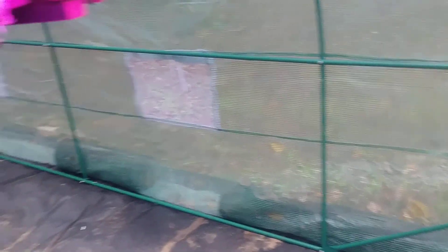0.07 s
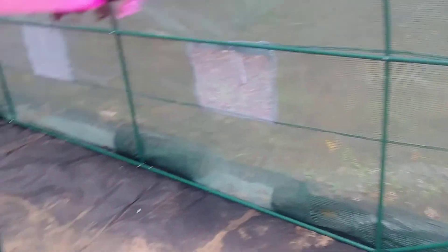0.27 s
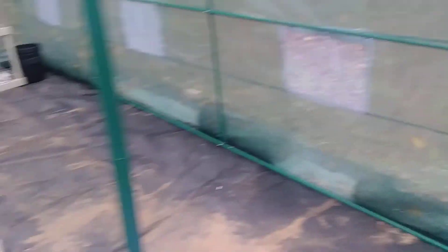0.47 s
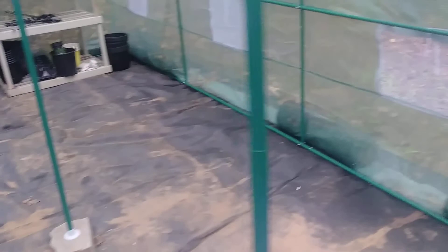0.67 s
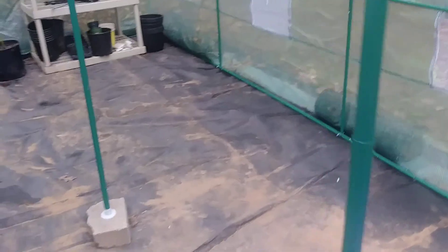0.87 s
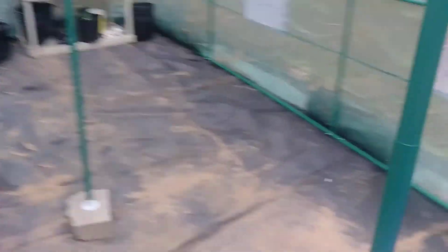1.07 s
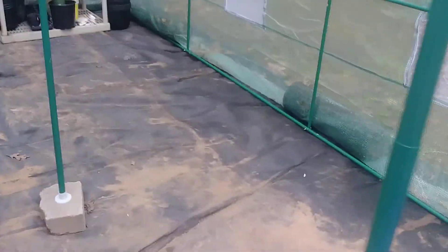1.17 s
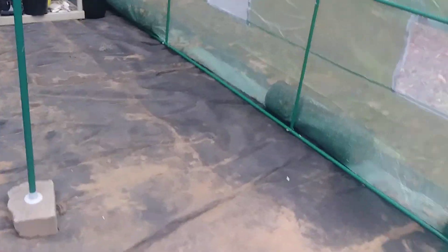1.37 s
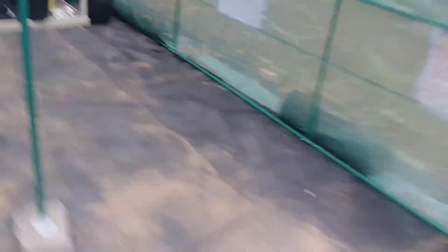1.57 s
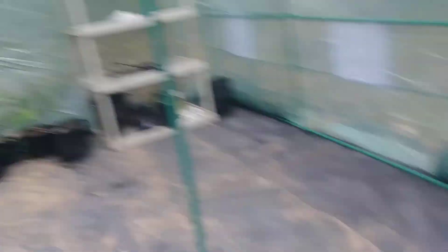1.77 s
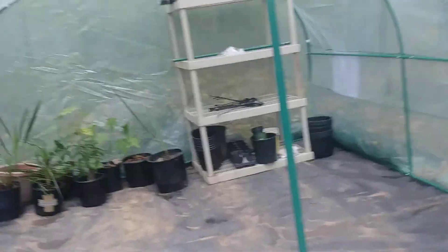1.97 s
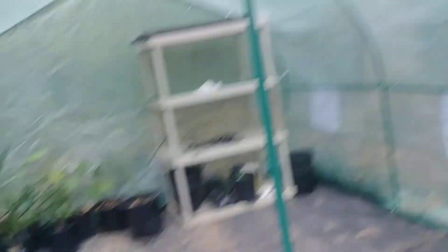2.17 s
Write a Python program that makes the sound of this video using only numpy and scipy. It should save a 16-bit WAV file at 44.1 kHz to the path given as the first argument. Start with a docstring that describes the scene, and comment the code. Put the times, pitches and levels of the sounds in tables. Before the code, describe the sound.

Rain patters on the plastic cover of a small greenhouse, heard from inside. Heavy drops tap sharply and unevenly, soften briefly midway, then come back hard, with a faint, flickering hiss of finer rain behind them.

```python
"""Rain on the plastic cover of a small greenhouse, heard from inside. From the start, fine rain
hisses further off over a low hush. At once heavy drops tap the taut sheet, each with its own colour,
and rattle round the tunnel in grainy echoes. They soften around one second, then come back hard.
All along, a noise suppressor eats most of the steady hiss and leaves a flickering rest."""
import sys
import numpy as np
from scipy import signal
from scipy.fft import rfft, irfft, next_fast_len
from scipy.io import wavfile
from scipy.ndimage import uniform_filter1d

SR = 44100
rng = np.random.default_rng(int(sys.argv[2]) if len(sys.argv) > 2 else 0)


def to_wav(s):
    """Save 16-bit WAV."""
    ch = np.atleast_2d(s).T  # columns
    pcm = np.round(np.clip(ch, -1, 1) * 32767)  # PCM
    wavfile.write(sys.argv[1], SR, pcm.astype(np.int16))


N = 97902


def amp(db):
    """Turns decibels into a factor to multiply by."""
    return 10 ** (np.asarray(db) / 20)


def unit(x):
    """Scales a signal to an average power of one."""
    return x / np.sqrt(np.mean(x ** 2) + 1e-20)


def glide(position, values):
    """Draws straight lines between values that lie one step apart."""
    return np.interp(position, np.arange(len(values)), values)


def band(x, low_hz, high_hz, order):
    """Keeps one range of frequencies, with the energy of the whole sound."""
    y = signal.sosfilt(signal.butter(order, [low_hz, high_hz], "band", fs=SR, output="sos"), x)
    return y * np.linalg.norm(x) / np.linalg.norm(y)


def coloured(x, curve, resonances=()):
    """Shapes a sound with a tone curve, lifted at any resonances."""
    size = 8192
    curve_hz, curve_db = np.transpose(curve)
    hz = np.fft.rfftfreq(size, 1 / SR)
    gain_db = np.interp(np.log(hz + 1), np.log(curve_hz + 1), curve_db)
    gain_db += sum(lift / (1 + (2 * (hz - centre) / width) ** 2) for centre, width, lift in resonances)
    # minimum phase: the filter rings after a tap, never before it
    cepstrum = irfft(np.log(amp(gain_db) + 1e-6))
    cepstrum *= np.r_[1, np.full(size // 2 - 1, 2), 1, np.zeros(size // 2 - 1)]
    return signal.fftconvolve(x, irfft(np.exp(rfft(cepstrum))))[:N]


# where the sheet rings or swallows sound: f/Hz, width/Hz, lift/dB
SHEET_RESONANCES = [(353, 55, 4), (490, 15, 2.5), (968, 77, 2.5), (1146, 77, 5), (1224, 7.5, -4.5),
                    (1582, 110, 2), (2045, 6.7, 16.5), (2283, 16, -1), (2690, 33, 2), (3350, 17, -6),
                    (4475, 30, 2.5), (4610, 38, -6.5), (4850, 31, 0.5), (5240, 13, -2.5)]
def plastic_sheet(x, curve):
    """The taut sheet adds its own ringing to the tone curve of any rain that hits it."""
    return coloured(x, curve, SHEET_RESONANCES)


# tone curve of the fine rain: f/Hz, relative level/dB
FINE_RAIN_TONE = [(470, -45.5), (800, -9.5), (1380, -5.5), (1580, -3), (1810, -9), (2570, 4.5), (3260, 1.5),
                  (4000, -9.5), (5300, -17), (6130, -39.5), (7970, -64), (13500, -120)]
def fine_rain(level_db=-49, ticks_per_s=560, scatter_db=2, hiss_share=0.63):
    """Small, far drops make ticks of uneven size over a hiss."""
    chance, size = rng.random((2, N))
    ticks = unit((chance < ticks_per_s / SR) * amp(-scatter_db * np.log(size + 0.0099)))
    mix = hiss_share * rng.standard_normal(N) + (1 - hiss_share) * ticks
    return amp(level_db) * unit(plastic_sheet(mix, FINE_RAIN_TONE))


# tone curve of the hush: f/Hz, relative level/dB
HUSH_TONE = [(25, -23.5), (70, 1.5), (110, 1.5), (250, -1), (1200, -10), (5000, -20.5), (7000, -34.5)]
def low_hush(level_db=-68, waver_db=4, wavers_per_s=14):
    """A faint, low noise whose level wavers at random."""
    waver = glide(np.arange(N) / SR * wavers_per_s, rng.standard_normal(N))
    return amp(level_db + waver_db * waver) * unit(coloured(rng.standard_normal(N), HUSH_TONE))


def grainy_echoes(t, hollow_db=2.5, hollow_hz=357.8, grain_db=2.5, grain_s=0.0015):
    """Noise as a train of uneven echoes; each spot of the sheet favours its own random pitches."""
    noise, grains, bumps = rng.standard_normal((3, len(t)))
    hollow = amp(hollow_db * glide(np.fft.rfftfreq(len(t), 1 / SR) / hollow_hz, bumps))
    unevenness = amp(grain_db * glide(t / grain_s, np.clip(grains, -2, 2)))
    return unit(irfft(rfft(noise) * hollow, len(t))) * unit(unevenness)


def tap_and_echoes(t, tap_db, echoes, fade_s, width_hz, rise_s=0.00076, near_db=-8.5, near_fade_s=0.083):
    """A sharp tap, then echoes that build and fade; the nearest walls add a quick answer."""
    tap = amp(tap_db) * (t == 0) * np.sqrt(SR / 2 / width_hz)  # stronger for a narrower band
    fade = amp(-60 * t / fade_s) + amp(near_db - 60 * t / near_fade_s)
    return tap + echoes * fade * (1 - np.exp(-t / rise_s))


# a drop's thump, low, middle, high and splash bands: low f/Hz, high f/Hz, base fade t/s (to -60 dB)
DROP_BANDS = [(244.7, 466, 0.12), (761, 1887, 0.24), (1980, 3660, 0.35), (3780, 5436, 0.2),
              (7100, 12240, 0.21)]
# a struck panel's three notes: sharpness (pitch over width), base fade t/s (to -60 dB)
PANEL_NOTES = [(3, .18), (6, 0.11), (7.5, 0.12)]
# tone curve of the sheet under heavy drops: f/Hz, level/dB
SHEET_TONE = [(200, -7), (380, -3.5), (800, -11.5), (1400, -9.5), (1850, -11), (2350, -5), (3230, -5.5),
              (4000, -7), (4450, -5), (5100, -14), (5800, -13), (6900, -2.5), (8500, -8.5), (12000, -26)]
# one drop a row: t/s, level/dB, base tap over echoes/dB, stretch of the fade times, five bands'
# level/dB, three notes' f/Hz and level/dB; band and note levels add to the drop's level
HEAVY_DROPS = [(0.001, -29, 8.5, 1.25, -37, -17.5, -6, -11, -32.5, 580, -21, 1460, -10, 2010, -9.5),
               (0.158, -48.5, 15, 1.3, -28.5, -19.5, -5, -21.5, -43.5, 583, -32, 1700, -10.5, 2870, -15.5),
               (0.237, -26, 0.5, 1.58, -13.5, -9.5, -9, -14, -70, 720, -8, 1295, -6, 3160, -9),
               (0.259, -26, 8.5, 0.55, -13.5, -17.5, -9.5, -7, -62.5, 750, -16, 773, -9, 3720, -12),
               (0.2975, -16.5, -7.5, 1.69, -17, -8.5, -17.5, -15, -72.5, 490, -18.5, 1024, -16.5, 3070, -15.5),
               (0.324, -16.5, 7, 0.77, -25.5, -6.5, -16, -17, -47.5, 1200, -14.5, 1500, -22, 2690, -26.5),
               (0.478, -19, 2.5, 1.2, -26, -8.5, -13.5, -20, -34, 702, -16.5, 1296, -12, 2370, -29.5),
               (0.596, -43, 17.5, 1.4, -35, -16.5, -30.5, -42, -63, 923, -4.5, 914, -15, 2690, -16),
               (0.628, -52, 7, 0.55, -26.5, 3, 10, -30, -45, 747, -39.5, 1086, -4.5, 2900, 4),
               (0.654, -31, 6.5, 1, -41, -11.5, -6, -29.5, -48, 662, -17, 1610, -5, 2220, -8),
               (0.678, -36, 4, 2.4, -47.5, -19.5, -6, -18, -49.5, 650, -29.5, 1530, -17.5, 2850, -7),
               (0.76, -33.5, 2, 2, -31.5, 4, -22, -42, -54, 630, -40, 1430, -1, 2560, -15.5),
               (0.785, -19, 3.5, 0.78, -30.5, -7.5, -8.5, -17.5, -47, 515, -20, 858, -6.5, 2330, -22),
               (0.796, -22, 8.5, 0.99, -37.5, -16, -8.5, -7.5, -31.5, 592, -9.5, 1480, -13, 2360, -20.5),
               (0.866, -21, 6.5, 1.36, -26.5, -14, -11.5, -12.5, -46, 678, -10.5, 1750, -7, 2300, -11),
               (0.897, -34, -5.5, 2.23, -25, -17, -4.5, -8, -49.5, 712, -26, 1780, -1, 1850, -4),
               (1.037, -42.5, 6.5, 1.3, -34.5, -18, -3, -22, -65, 748, -34, 943, -20, 2700, -9),
               (1.067, -36.5, 5.5, 1.4, -48.5, -11.5, -4.5, -32, -61.5, 1230, -10, 1525, -1.5, 2540, -6.5),
               (1.134, -39.5, 1.5, 0.49, -36, -16, -16.5, -11, -52, 525, -33.5, 1646, -1.5, 3370, -1),
               (1.214, -48.5, 8, 0.32, -30, -12, 3, -5.5, -38.5, 758, -29, 2130, -5, 3790, -14),
               (1.244, -41, 6, 1.63, -58.5, -18, 1, -7.5, -59, 550, -39, 1630, -31, 3260, 2),
               (1.278, -44, 6, 0.69, -38, -25, -27.5, -29, -49, 712, -37, 1710, 1, 2310, -18),
               (1.326, -18, 8.5, 1.06, -49.5, -23, -13.5, -12.5, -52, 783, -27.5, 1675, -15, 2530, -16.5),
               (1.345, -52, 17, 1.6, -39, -7.5, 0, 6, -43.5, 726, -33.5, 1640, -4.5, 3230, -8.5),
               (1.376, -17.5, 9.5, 1.26, -42.5, -13, -15, -11, -40.5, 436, -34.5, 1260, -11, 3285, -11.5),
               (1.508, -33, 6, 1.54, -11, -1, -19, -15.5, -55, 660, -7, 1180, -2.5, 2900, -8.5),
               (1.57, -27, 6, 0.47, -30.5, -13.5, -11, -22, -45, 570, -23, 1244, -10, 2760, -29.5),
               (1.587, -27.5, 10, 0.84, -43, -26, -21.5, -6.5, -52, 763, -30.5, 1430, -10, 2700, -18.5),
               (1.601, -35, 4, 3.6, -43.5, -11, -1.5, 0.5, -41, 614, -37.5, 1454, -16, 2940, -2.5),
               (1.625, -28, -13, 2.24, -21, -6.5, -7.5, -7.5, -31, 748, -9.5, 1220, -30, 3120, -7.5),
               (1.641, -19, 3, 1.08, -25.5, -15.5, -10, -13, -32, 510, -39.5, 1574, -13, 2220, -10),
               (1.685, -32.5, 1, 0.84, -27, -23, -23, -14, -53, 750, -25, 1540, -3.5, 2660, -15.5),
               (1.734, -24.5, -10, 0.57, -58, -12.5, -7, -8, -43, 730, -18, 1017, -5, 2230, -6),
               (1.745, -30.5, 9.5, 0.87, -63, -1, -31, -18, -36, 657, -27, 977, -5.5, 2500, -14),
               (1.807, -19, 8, 1.31, -26, -9, -19, -14.5, -47, 702, -21, 1266, -17.5, 2196, -17),
               (1.868, -15, 7, 1.01, -25, -13, -18.5, -14.5, -53, 612, -25, 1490, -10, 2450, -18.5),
               (1.95, -30.5, 7.5, 1.9, -36.5, -10, -13.5, -18.5, -47, 648, -35.5, 1193, -8.5, 2550, -10),
               (2.025, -18.5, 10, 1.62, -29.5, -9, -15, -14, -43.5, 620, -30, 1535, -8, 2230, -17.5),
               (2.064, -31.5, 16, 1.9, -37.5, -11, -8.5, -18, -45, 587, -17.5, 997, -24.5, 2015, -10.5),
               (2.141, -23, -1, 1.03, -18, -6, -7.5, -12, -32.5, 569, -8.5, 1465, -5.5, 2450, -21),
               (2.158, -27.5, 3, 1.18, -43, -3.5, -16, -4, -24, 480, -17.5, 890, 0.5, 2580, -17.5),
               (2.203, -17.5, 9.5, 2, -26, -6, -16, -13, -37, 690, -19, 1073, -17, 1980, -16)]
def heavy_drops(start_delay_s=0.000933, tap_lift_db=1):
    """Each drop taps, dies away band by band and sounds its panel's notes."""
    t = np.arange(SR // 3) / SR
    track = np.zeros(N + SR)
    for time_s, level_db, tap_db, stretch, *colour in HEAVY_DROPS:
        band_levels = colour[:len(DROP_BANDS)]
        notes = np.reshape(colour[len(DROP_BANDS):], (-1, 2))
        echoes = grainy_echoes(t)
        start = round((time_s + start_delay_s) * SR)
        span = slice(start, start + len(t))
        for db, (low_hz, high_hz, fade_s) in zip(band_levels, DROP_BANDS):
            burst = tap_and_echoes(t, tap_db + tap_lift_db, echoes, fade_s * stretch, high_hz - low_hz)
            track[span] += amp(level_db + db) * band(burst, low_hz, high_hz, order=5)
        for (hz, db), (sharpness, fade_s) in zip(notes, PANEL_NOTES):
            width = hz / sharpness
            burst = tap_and_echoes(t, tap_db + tap_lift_db, echoes, fade_s * stretch, width)
            track[span] += amp(level_db + db) * band(burst, hz - width / 2, hz + width / 2, order=3)
    return plastic_sheet(track[:N], SHEET_TONE)


def noise_suppressor(x, share_removed=0.93, deepest_cut_db=-14.5):
    """Takes most of the steady power, judged from the quiet moments, out of every frequency."""
    spectra = signal.stft(x, nperseg=1024, noverlap=768)[2]
    power = uniform_filter1d(abs(spectra) ** 2, size=3, axis=-1)  # smoothed over time
    quiet = np.percentile(power, 30, axis=-1, keepdims=True)
    steady = uniform_filter1d(quiet, size=9, axis=-2)  # smoothed over frequency
    gain = np.sqrt(np.clip(1 - share_removed * steady / (power + 1e-20), amp(deepest_cut_db) ** 2, 1))
    return signal.istft(spectra * gain, nperseg=1024, noverlap=768)[1][..., :N]


def scene():
    """Heavy and fine rain together, in one channel."""
    return (heavy_drops() + fine_rain())[None]


def record(dry):
    """Turns the steady rain down, adds the hush and faint electronic hiss, and cuts the top treble."""
    hiss_db, top_hz = -95, 12750
    mix = noise_suppressor(dry) + low_hush() + amp(hiss_db) * rng.standard_normal(dry.shape)
    size = next_fast_len(N + SR // 2)
    below_top = np.fft.rfftfreq(size, 1 / SR) < top_hz
    return irfft(rfft(mix, size) * below_top, size)[..., :N]


dry = scene()
out = record(dry)
to_wav(out)
```